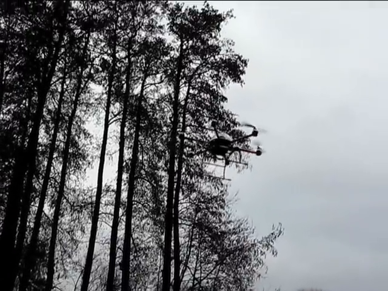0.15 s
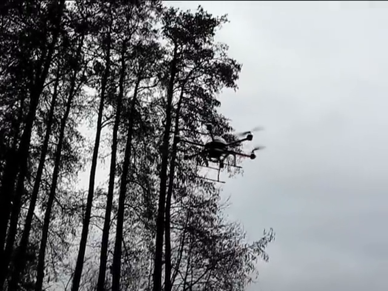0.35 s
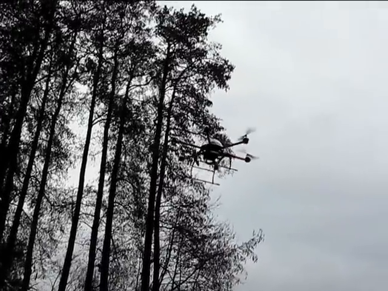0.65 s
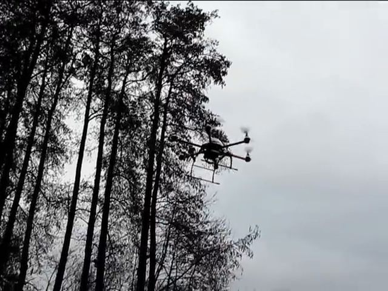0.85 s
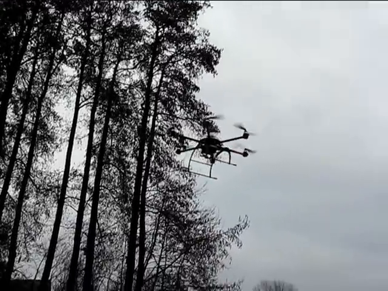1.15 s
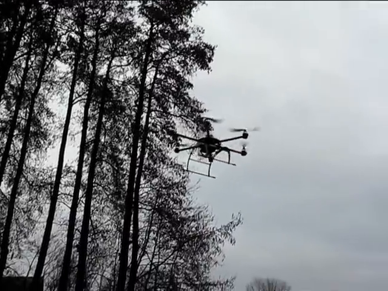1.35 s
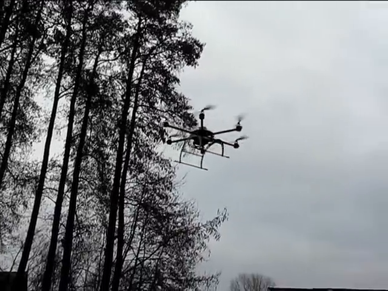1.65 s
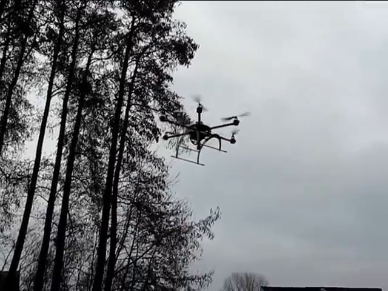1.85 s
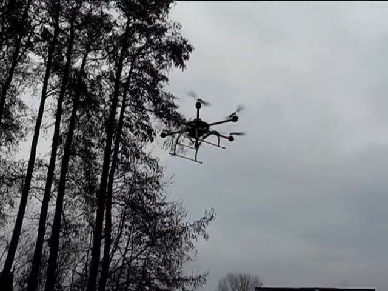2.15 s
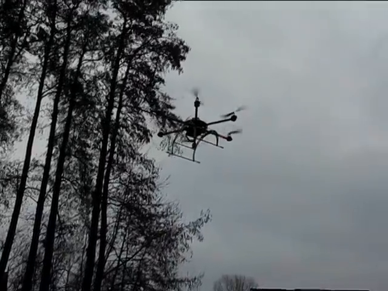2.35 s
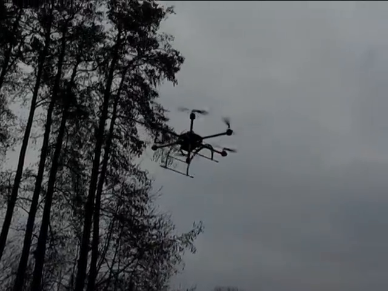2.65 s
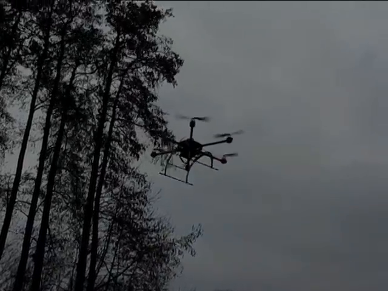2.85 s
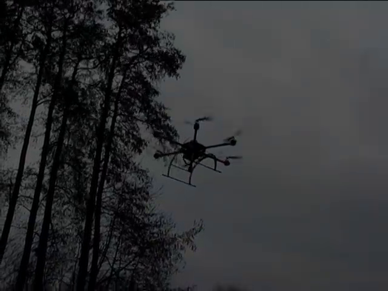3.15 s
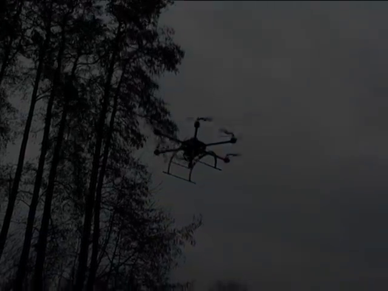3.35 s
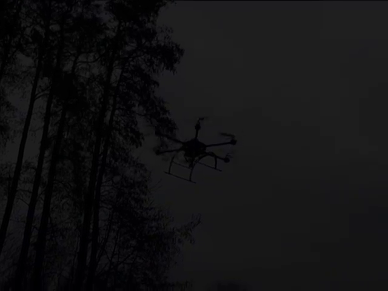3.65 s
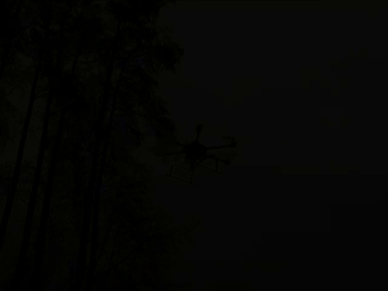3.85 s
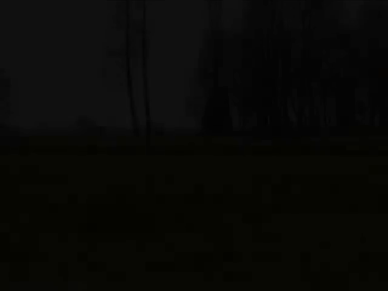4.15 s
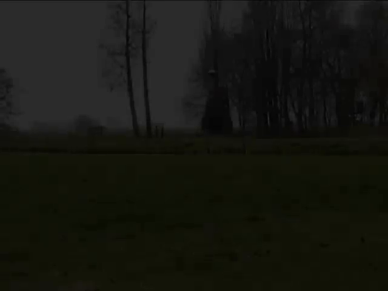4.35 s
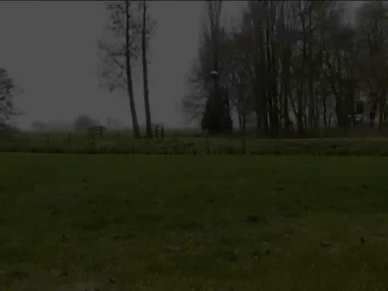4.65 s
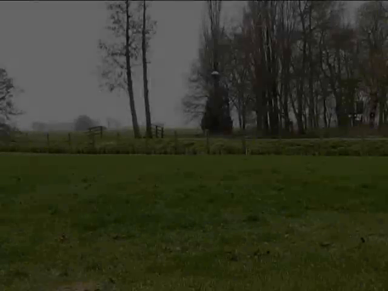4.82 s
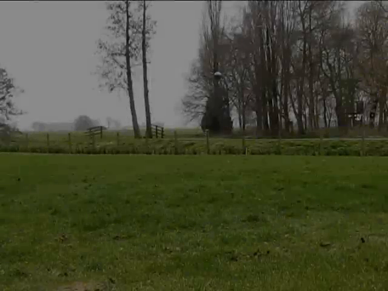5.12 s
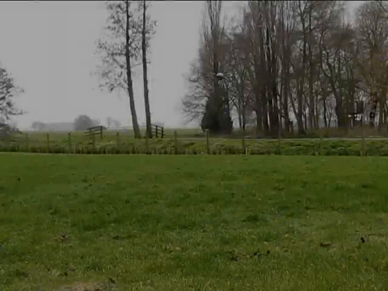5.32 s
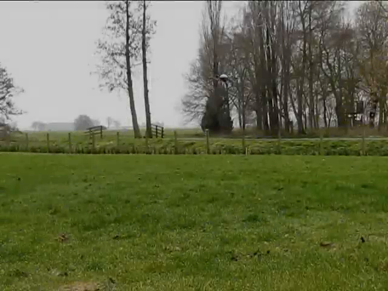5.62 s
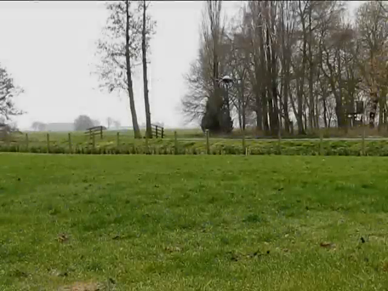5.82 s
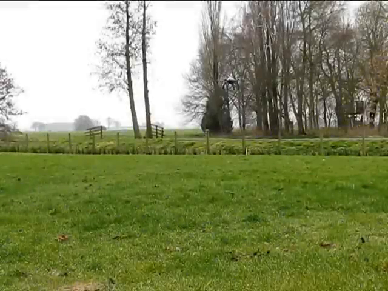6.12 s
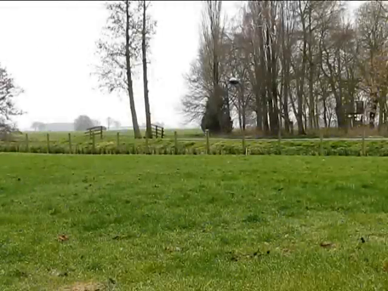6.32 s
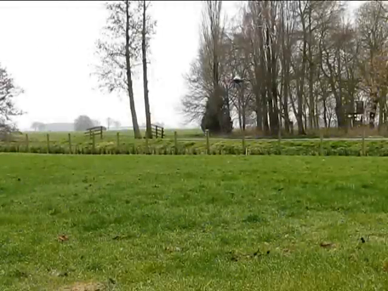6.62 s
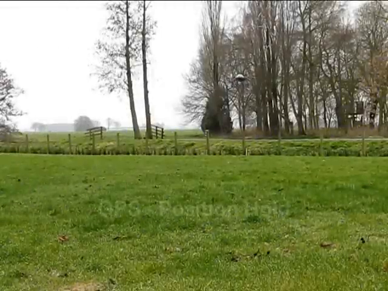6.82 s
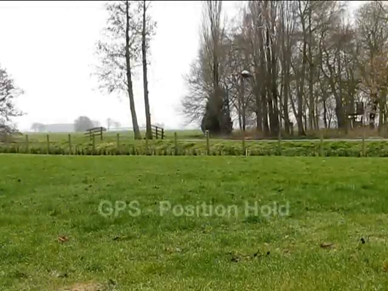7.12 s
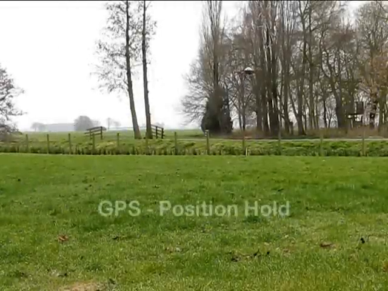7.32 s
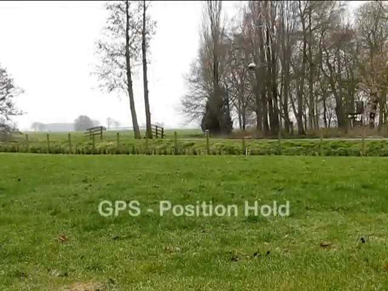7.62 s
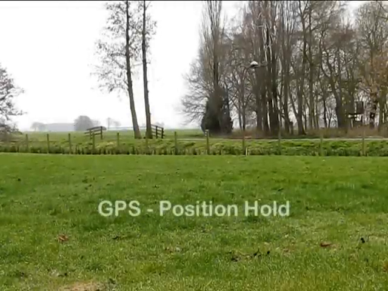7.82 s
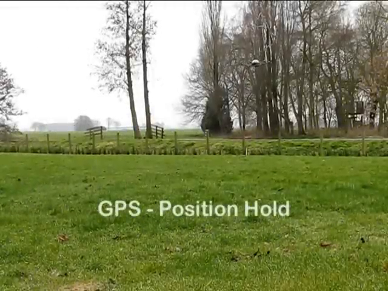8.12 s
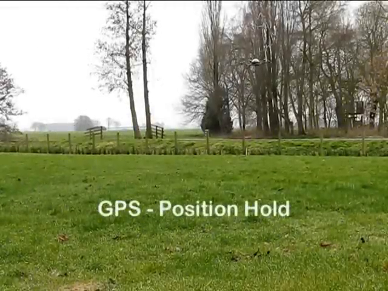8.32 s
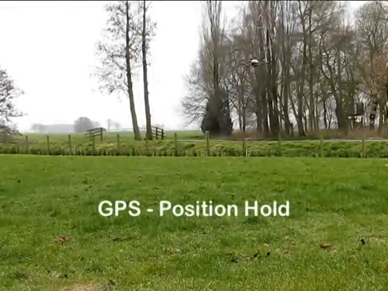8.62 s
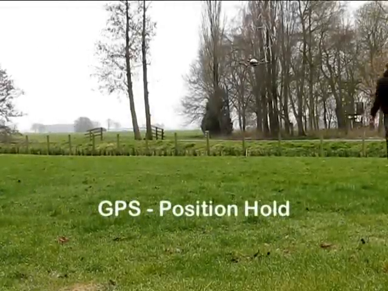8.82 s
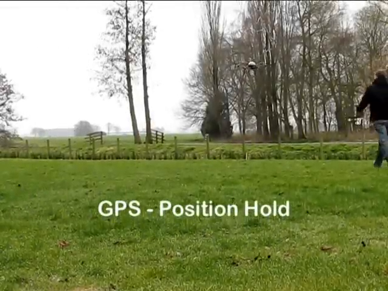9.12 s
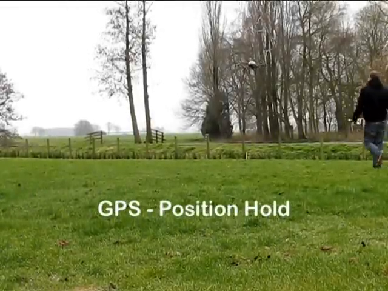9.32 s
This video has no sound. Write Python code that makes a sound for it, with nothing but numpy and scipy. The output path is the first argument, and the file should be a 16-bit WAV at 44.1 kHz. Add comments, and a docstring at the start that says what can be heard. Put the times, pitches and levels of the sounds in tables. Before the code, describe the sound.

A six-rotor drone manoeuvres close overhead outdoors, its propellers humming over a rushing hiss while the electric motors whine and waver in pitch. Gusts rumble on the microphone. The sound fades to a brief silence about four seconds in, then fades back with the drone much quieter, hovering far across a field. The gusts return and a small bird gives a few faint chirps.

```python
"""A hexacopter manoeuvres close overhead: six two-blade rotors hum and chop a rush of air, their motors
whine, and one sings when its harmonic meets the motor bell's resonance. The ground echoes it,
trees scatter it and gusts buffet the microphone. The sound fades out and breaks at about 4 s.
It fades back in with the craft hovering far across a field, its drives whistling thinly.
The gusts return and a small bird calls faintly."""
import sys
import numpy as np
from scipy import signal
from scipy.fft import rfft, irfft, next_fast_len
from scipy.io import wavfile
from scipy.ndimage import map_coordinates

SR = 44100
rng = np.random.default_rng(int(sys.argv[2]) if len(sys.argv) > 2 else 0)


def log_audio(samples):
    """Write samples as a 16-bit WAV file to the path given in sys.argv[1]."""
    # one column per channel
    frames = np.atleast_2d(samples).T
    # limit to full scale, then quantise
    limited = np.clip(frames, -1, 1)
    pcm = np.round(limited * 32767).astype(np.int16)
    wavfile.write(sys.argv[1], SR, pcm)


N = 417627
TIME = np.arange(N) / SR
FFT_SIZE = next_fast_len(N)
FREQ = np.maximum(np.fft.rfftfreq(FFT_SIZE, 1 / SR), 1)
STEPS_PER_TURN, COGS_PER_TURN = 42, 56  # a motor's commutation steps and cogging ripples


def undb(db):
    """Decibels to gain."""
    return 10 ** (np.asarray(db) / 20)


def unit(x):
    """Scale to rms 1."""
    return x / np.sqrt(np.mean(x ** 2))


def curves(rows):
    """Automation lanes from a time table, one value a sample."""
    time_s, *columns = np.transpose(rows)
    return [np.interp(TIME, time_s, column) for column in columns]


def colour(points):
    """An EQ curve from (freq_hz, level_db) points."""
    hz, db = np.transpose(points)
    return undb(np.interp(np.log(FREQ), np.log(hz), db))


def shape(x, gain):
    """Filter by a gain at each frequency."""
    return irfft(rfft(x, FFT_SIZE) * gain, FFT_SIZE)[..., :N]


def noise(gain, band_hz=(0, SR)):
    """Coloured noise with rms 1 inside a band."""
    inside = (FREQ > band_hz[0]) & (FREQ < band_hz[1])
    return shape(rng.standard_normal(N), gain / np.sqrt(np.mean(abs(gain * inside) ** 2)))


def walk(per_s):
    """Random drift with spread near 1, gliding through per_s points a second."""
    points = rng.standard_normal(4096)
    return 1.2 * np.interp(TIME * per_s, np.arange(len(points)), points)


def turn(hz):
    """Running phase of a frequency curve, from a random start."""
    return 2 * np.pi * (np.cumsum(hz) / SR + rng.random())


def delay(x, lag_s):
    """A moving delay; cubic steps keep the treble."""
    return map_coordinates(x, [(TIME - lag_s) * SR], order=3)


def blade_hum(shafts, rotor_dbs, tones):
    """Steady loading favours the nearest rotor; turbulence shakes high tones and evens the rotors out."""
    hum = 0
    for shaft, rotor_db in zip(shafts, rotor_dbs):
        for multiple, db in tones:
            gain = undb(db + rotor_db * min(1, 7 / multiple))
            shake = 0.081 * multiple * walk(30)
            hum = hum + gain * np.sin(multiple * shaft + shake)
    return unit(hum)


def blade_rush(shafts, spectrum, rush_db, hiss_db, chop):
    """Broad noise that swells as each blade swings toward the listener; its hiss has its own fader."""
    swish = unit(sum(np.cos(s) + 1.02 * np.cos(2 * s) + .5 * np.cos(4 * s) for s in shafts))
    air = noise(colour(spectrum), band_hz=(600, 2200)) * unit(1 + chop * swish)
    treble = shape(air, 1 / (1 + (5500 / FREQ) ** 6))
    treble_rms = np.std(shape(air, FREQ > 7000))
    return (air - treble) * undb(rush_db) + treble / treble_rms * undb(hiss_db)


def motor_tone(shaft, order, wobble, rough):
    """A shaft harmonic, swayed once a turn by imbalance and twice by blade load."""
    sway = wobble * (np.sin(shaft) + 0.99 * np.sin(2 * shaft + 1)) + rough * walk(260)
    throb = 1 + .3 * wobble * np.cos(shaft + 2) + .15 * walk(22)
    return throb * np.sin(order * shaft + sway)


def motor_whine(shafts, motor_dbs, cog_db, wobble, rough):
    """Every motor's commutation tone, plus cogging from the first."""
    whine = sum(undb(db) * motor_tone(shaft, STEPS_PER_TURN, wobble, rough)
                for shaft, db in zip(shafts, motor_dbs))
    return unit(whine + undb(cog_db) * motor_tone(shafts[0], COGS_PER_TURN, wobble, rough))


def bell_resonance(pitch_hz, centre_hz=5035, half_width_hz=95):
    """How strongly a pitch excites the motor bell, 0 to 1."""
    detune = (pitch_hz - centre_hz) / half_width_hz
    return 1 / (1 + detune ** 2 + detune ** 4 / 2)


def motor_song(shaft, level_db, in_tune):
    """The second commutation harmonic sings at the bell's resonance, flickering as the load changes."""
    flicker_db = 2.2 * walk(35)
    tone = unit(motor_tone(shaft, 2 * STEPS_PER_TURN, wobble=.4, rough=.15))
    return undb(level_db + flicker_db) * in_tune * tone


# The motor bells' close pair of modes: pitch_hz, half_width_hz, level_db
BELL_MODES = [(4963, 130, -0.5), (5214, 150, -1.5)]


def bell_ring(shaft, level_db):
    """Drive ripple keeps the bells ringing roughly, pulsing once a turn."""
    modes = sum(undb(db) / (1 + ((FREQ - hz) / width) ** 2) for hz, width, db in BELL_MODES)
    return noise(modes) * (1 + 0.1 * np.cos(shaft)) * undb(level_db)


def drone(step_hz, song_hz, levels, motors, tones, spectrum, *, hum_db, slow_hum_db, air_db, chop,
          whine_db, cog_db, wobble, rough, song_db, swell_db):
    """Six rotors under small, ever-wandering speed trims; returns an air stem and a motor stem."""
    rush_db, motor_db, hiss_db, bell_db = curves(levels)
    surge_db = 0.63 * walk(14)  # the blades bite into uneven air
    rush_db, motor_db = rush_db + surge_db, motor_db + surge_db
    ratios, whine_dbs, hum_dbs = np.transpose(motors)
    shafts = []
    for ratio in ratios:
        trim = 1 + (.003 + .04 * abs(1 - ratio)) * walk(8)
        shafts.append(turn(step_hz / STEPS_PER_TURN * ratio * trim))
    song_hz = song_hz * (1 + .004 * walk(20))
    slow_shaft = turn(song_hz / (2 * STEPS_PER_TURN))  # the sixth, slowest motor is the singer
    shafts.append(slow_shaft)
    whine = undb(whine_db + motor_db) * motor_whine(shafts, [*whine_dbs, -8], cog_db, wobble, rough)
    in_tune = bell_resonance(song_hz)
    song = motor_song(slow_shaft, bell_db + song_db, in_tune)
    ring = bell_ring(slow_shaft, bell_db + swell_db * in_tune)
    hum = undb(hum_db + rush_db) * blade_hum(shafts, [*hum_dbs, slow_hum_db], tones)
    rush = undb(air_db) * blade_rush(shafts, spectrum, rush_db, hiss_db, chop)
    return hum + rush, whine + ring + song


def ground_echo(x, lag_s=.00675, share=.6, cutoff_hz=1800):
    """Adds the bounce off the grass, dull and a little late, drifting with the craft's height."""
    bounce = shape(x, share / (1 + (FREQ / cutoff_hz) ** 2))
    return x + delay(bounce, lag_s * (1 + 0.012 * walk(2.018)))


# EQ of the wash from the trees: freq_hz, level_db
TREE_EQ = [(100, -24), (500, -24), (1200, -16), (2600, -10), (5000, -13), (8000, -9), (15000, -3)]


def tree_scatter(x, t60_s, wash_db=1):
    """Adds a diffuse stereo wash from the trees, whose paths keep shifting."""
    tails = rng.standard_normal((2, SR // 2)) * undb(-60 * TIME[:SR // 2] / t60_s)
    tails /= np.sqrt(np.sum(tails ** 2, axis=1, keepdims=True))
    wash = shape(x, rfft(tails, FFT_SIZE) * colour(TREE_EQ) * undb(wash_db))
    return x + np.array([delay(channel, .0008 * walk(1.5)) for channel in wash])


def pan(x, image):
    """Lean each frequency to one side by level and phase."""
    hz, db, lead_rad = np.transpose(image)
    phase = np.interp(np.log(FREQ), np.log(hz), lead_rad)
    lean = colour(np.c_[hz, db / 2]) * np.exp(.5j * phase)
    return shape(x, np.array([lean, 1 / lean]))


# Motor speeds through the manoeuvres: time_s, commutation_hz, song_hz
CLOSE_THROTTLE = [(0.0, 2837, 4880), (0.42, 2749, 4886), (0.9, 2850, 4806), (1.12, 2900, 4910),
                  (1.2, 2922, 4980), (1.35, 2983, 5040), (1.47, 3013, 4966), (1.57, 2982, 5080),
                  (1.67, 2910, 4980), (1.78, 2850, 5050), (1.86, 2838, 4880), (2.42, 2766, 4780),
                  (2.7, 2850, 4910), (2.95, 2930, 4900), (3.22, 3014, 5090), (3.52, 2834, 4913),
                  (3.78, 2812, 4980), (3.98, 2820, 5006)]
# Fader rides as the craft tilts and drifts, before trims: time_s, rush_db, whine_db, hiss_db, bell_db
CLOSE_FADERS = [(0.0, -29, -26, -30.5, -32.5), (0.43, -29, -23.5, -29.5, -31.5),
                (0.95, -26, -26.5, -29, -31.5), (1.45, -27.5, -26.5, -29.5, -33.5),
                (1.78, -28, -23, -29, -33), (2.2, -25, -25.5, -28.5, -32.5), (2.48, -27, -24, -29.5, -33),
                (3.0, -25, -24, -28, -32), (3.55, -28, -23.5, -29.5, -32.5),
                (3.95, -24.5, -19.5, -26, -30.5)]
# Balance of the five motors beside the singer: speed_ratio, whine_db, hum_db
CLOSE_MOTORS = [(1.1, -4.5, -12.5), (1.025, -4, -7), (1.0, 0.5, 3), (.975, -4, -6), (.9, -5, -22.5)]
# Partials of one rotor's hum: shaft_multiple, level_db
CLOSE_PARTIALS = [(2, -5), (4, -6), (6, -2), (8, -0.5), (10, -18), (12, -4.5), (14, -23), (16, -18),
                  (18, -8)]
# EQ of the blade rush: freq_hz, level_db
CLOSE_RUSH_EQ = [(80, -14), (200, -15), (330, -1), (450, 5.5), (680, -3.5), (880, -1), (1200, -0.5),
                 (2050, -2), (2700, 0), (3400, 0.5), (4600, -1.5), (5900, -3), (7100, 0.5), (15500, -12)]
# Stereo image overhead: freq_hz, left_minus_right_db, left_lead_rad
CLOSE_IMAGE = [(500, -0.5, 0.0074), (1310, 0, 0.035), (2010, -2, -0.5), (2450, -6, -0.1), (3080, -5, 0.71),
               (3920, 2, 0.73), (4800, 1.5, 0.36), (7500, -1, 0.29), (12600, -0.5, -0.054), (15500, 2, .2)]


def close_hover():
    """The craft manoeuvres overhead, its hum and rush doubled by the ground."""
    step_hz, song_hz = curves(CLOSE_THROTTLE)
    air, motors = drone(step_hz, song_hz, CLOSE_FADERS, CLOSE_MOTORS, CLOSE_PARTIALS, CLOSE_RUSH_EQ,
                        hum_db=-6.5, slow_hum_db=-12.5, air_db=-0.5, chop=0.13,
                        whine_db=-2.5, cog_db=-10, wobble=.85, rough=.55, song_db=8.5, swell_db=2)
    return pan(tree_scatter(ground_echo(air) + motors, t60_s=.4), CLOSE_IMAGE)


# Gusts on the microphone, before trim: start_s, hold_s, level_db, left_minus_right_db
GUSTS = [(0.03, 0.32, -39.5, -14), (0.378, 0.66, -33, -11.5), (1.12, 0.17, -38.5, -17),
         (1.33, 0.1, -42, -10), (1.74, 0.2, -39, -12), (2.14, 0.04, -42, -10), (2.519, 0.066, -33, -12),
         (5.92, 0.22, -35, -5), (6.25, 0.058, -42, 0), (6.42, 0.36, -44, -1), (6.862, 0.417, -38, 7),
         (7.53, 0.049, -46, 6), (7.68, 0.08, -40, 3), (7.8, 0.09, -37, 3), (8.03, 0.09, -40, 7),
         (8.16, 0.038, -38, -8), (8.28, 0.041, -35, 10), (8.371, 0.046, -34.5, 11), (8.7, 0.08, -40, 3)]
# EQ of the wind's rumble: freq_hz, level_db
RUMBLE_EQ = [(20, -21), (45, 0), (85, 2), (135, 0.5), (200, -4.5), (300, -14.5), (600, -23.5), (2000, -76)]


def wind(breeze_db=-55, gust_trim_db=-2.5, attack_s=.013, release_s=.03, eddy_db=3, eddies_per_s=30):
    """Gusts rise, hold and die away over a light breeze, thumping each microphone port separately."""
    power = np.full((2, N), undb(breeze_db) ** 2)
    for start_s, hold_s, db, side_db in GUSTS:
        end_s = start_s + hold_s
        swell = np.interp(TIME, [start_s - attack_s, start_s, end_s, end_s + release_s], [0, 1, 1, 0])
        gains = undb(db + gust_trim_db + np.array([side_db, -side_db]) / 2)
        power += np.outer(gains, swell) ** 2
    rumble = [noise(colour(RUMBLE_EQ), band_hz=(25, 110)) for _ in range(2)]
    return np.sqrt(power) * rumble * undb(eddy_db * walk(eddies_per_s))


def fades(out_from_s=2.216, cut_s=4.005, zero_s=4.058, return_s=4.068, full_s=6.16):
    """Gains of the two scenes: a long fade out, a gated gap, a long fade in."""
    down = np.clip((zero_s - TIME) / (zero_s - out_from_s), 0, 1) ** 1.172
    up = np.clip((TIME - zero_s) / (full_s - zero_s), 0, 1) ** 1.017
    gate_shut = np.clip((cut_s - TIME) * 100, 0, 1)
    gate_open = np.clip((TIME - return_s) * 30, 0, 1)
    return down * gate_shut, up * gate_open


# Delay of the reflection off the airframe: time_s, lag_ms
AIRFRAME_LAG = [(4.1, 0.32), (4.9, 0.32), (5.5, 0.31), (6.6, 0.3), (7.8, 0.35), (9.4, 0.36)]


def airframe_comb(x, share=.25):
    """Treble glancing off the airframe combs the hiss; the comb slides as the craft drifts."""
    lag_ms, = curves(AIRFRAME_LAG)
    treble = shape(x, 1 / (1 + (5000 / FREQ) ** 6))
    return x + share * delay(treble, lag_ms / 1000)


# Switching tones of the motor drives, before trim: pitch_hz, level_db
DRIVE_TONES = [(7854, -69), (14626, -79), (14853, -79), (15601, -67)]


def drive_whistles(trim_db=2):
    """Thin, wavering whistles from the switching of the motor drives."""
    return sum(undb(db + trim_db) * unit(np.sin(turn(hz + 25 * walk(60)))) for hz, db in DRIVE_TONES)


# Throttle while holding position: time_s, commutation_hz
DISTANT_THROTTLE = [(4.3, 2930), (4.57, 2990), (4.66, 2950), (4.83, 3054), (5.0, 2966), (5.35, 2953),
                    (5.5, 3030), (5.78, 2945), (6.0, 2973), (6.46, 2983), (6.58, 3064), (6.76, 3082),
                    (6.9, 2996), (7.1, 2966), (7.3, 3050), (7.42, 2943), (7.56, 3000), (7.7, 2908),
                    (8.08, 2920), (8.25, 2970), (8.45, 2890), (8.67, 2990), (8.86, 3023), (9.13, 2958),
                    (9.46, 2930)]
# Fader rides across the field, before trims: time_s, rush_db, whine_db, hiss_db, bell_db
DISTANT_FADERS = [(4.3, -42, -42.5, -48.5, -43.5), (5.0, -43.5, -44, -49, -41.5),
                  (5.5, -43, -40, -48.5, -42), (6.2, -44.5, -40, -49, -42.5),
                  (6.8, -44.5, -42.5, -49.5, -42), (7.55, -45, -43, -52.5, -45),
                  (8.0, -44, -44, -49, -42.5), (8.85, -43.5, -43, -49.2, -42.5),
                  (9.4, -43, -43.5, -49.5, -42.5)]
# Balance of the five motors beside the singer: speed_ratio, whine_db, hum_db
DISTANT_MOTORS = [(1.005, 1.5, 1.5), (0.99, -0.5, -2), (.895, -2.5, -7), (.865, -6, -6.5), (.84, -5.5, -5)]
# Partials of one rotor's hum: shaft_multiple, level_db
DISTANT_PARTIALS = [(2, -2), (4, -8.5), (5, -9), (6, 1), (8, -15), (10, -14), (12, -6.5)]
# Duller EQ of the blade rush: freq_hz, level_db
DISTANT_RUSH_EQ = [(50, 4), (200, 1.5), (380, 7), (600, 2), (1000, -1.5), (1550, 2), (2000, -2), (2600, 4),
                   (3300, -4), (4200, -3), (6000, -7.5), (8000, -10), (11000, -16.5), (15500, -19.5)]
# Stereo image, leaning right: freq_hz, left_minus_right_db, left_lead_rad
DISTANT_IMAGE = [(476, 0.4, 0), (1250, -6, 0), (2400, -4.5, 0), (4450, 0, 0), (15000, -1.5, 0)]


def distant_hover(song_ratio=1.672):
    """The craft holds its position across the field; all motors follow one throttle."""
    step_hz, = curves(DISTANT_THROTTLE)
    air, motors = drone(step_hz, song_ratio * step_hz,
                        DISTANT_FADERS, DISTANT_MOTORS, DISTANT_PARTIALS, DISTANT_RUSH_EQ,
                        hum_db=-2, slow_hum_db=-2.5, air_db=0.5, chop=0.083,
                        whine_db=0.5, cog_db=-11, wobble=.55, rough=.35, song_db=7.2, swell_db=1.2)
    craft = airframe_comb(air) + motors + drive_whistles()
    return pan(tree_scatter(craft, t60_s=.5), DISTANT_IMAGE)


# A small bird's calls: start_s, length_s, start_hz, end_hz, level_db
BIRD_CALLS = [(6.48, 0.063, 4400, 4170, -39), (6.708, 0.07, 4280, 4090, -47),
              (6.814, 0.058, 4300, 4350, -45), (6.932, 0.054, 4320, 4397, -43)]


def bird():
    """Thin, short gliding calls with a quiver in the pitch."""
    calls = np.zeros(N)
    for start_s, length_s, start_hz, end_hz, db in BIRD_CALLS:
        along = np.clip((TIME - start_s) / length_s, 0, 1)
        pitch_hz = start_hz + (end_hz - start_hz) * along + 40 * walk(200)
        calls += undb(db) * np.sin(np.pi * along) * np.sin(turn(pitch_hz))
    return calls


def scene():
    """The close hover, a moment of silence, then the distant hover."""
    buffet = wind()
    fade_out, fade_in = fades()
    return fade_out * (close_hover() + buffet) + fade_in * (distant_hover() + buffet + bird())


def record(dry):
    """A steep high cut at 15.8 kHz."""
    return signal.sosfilt(signal.ellip(12, .1, 80, 15800, fs=SR, output="sos"), dry)


dry = scene()
out = record(dry)
log_audio(out)
```